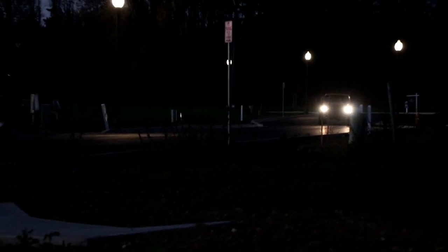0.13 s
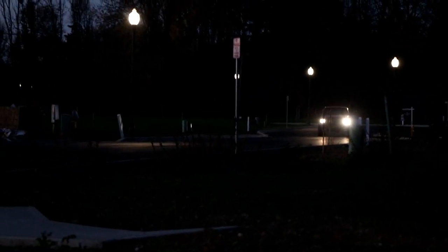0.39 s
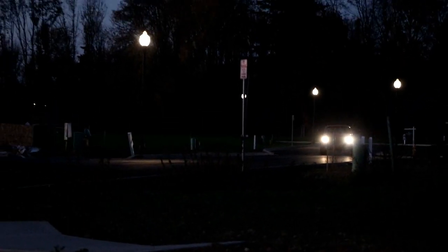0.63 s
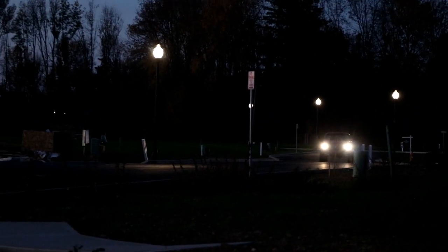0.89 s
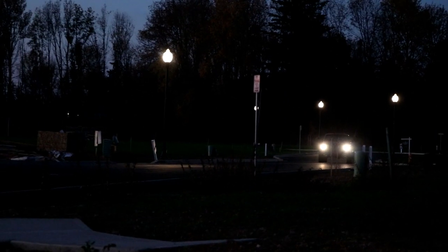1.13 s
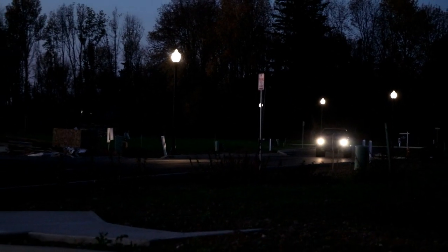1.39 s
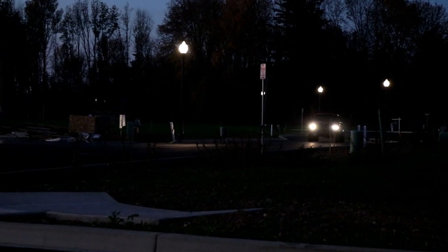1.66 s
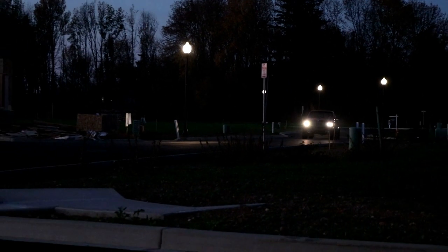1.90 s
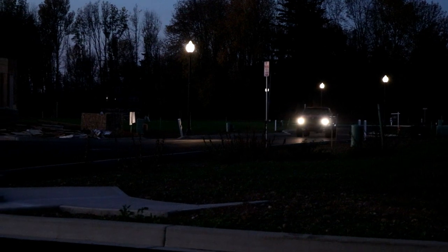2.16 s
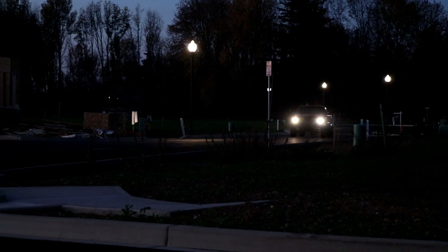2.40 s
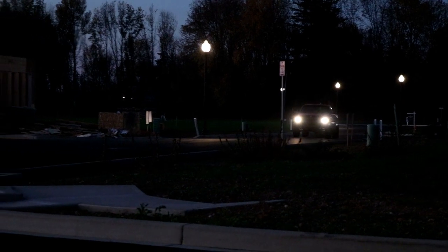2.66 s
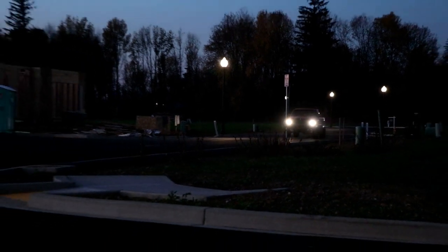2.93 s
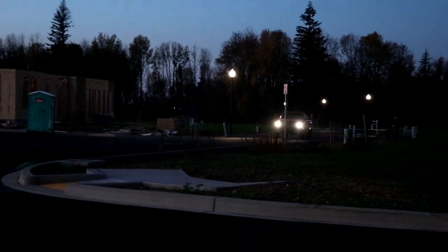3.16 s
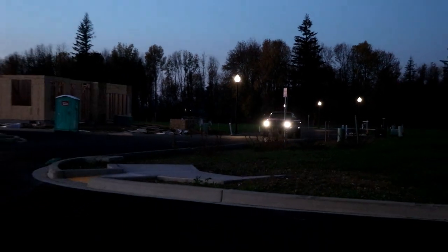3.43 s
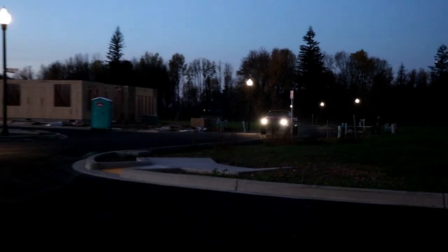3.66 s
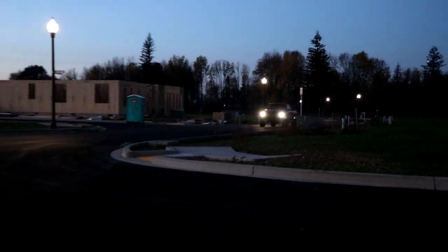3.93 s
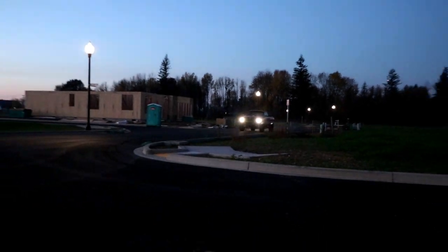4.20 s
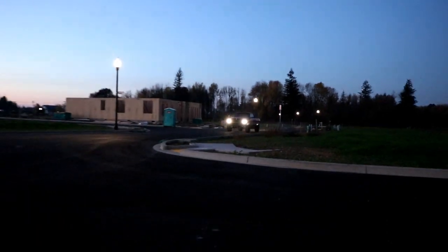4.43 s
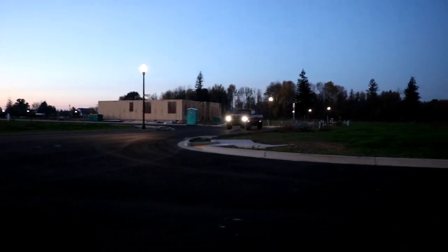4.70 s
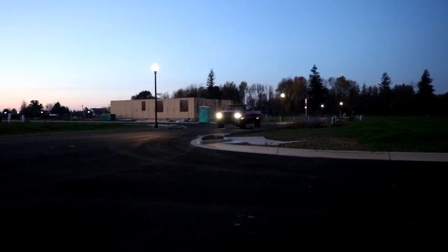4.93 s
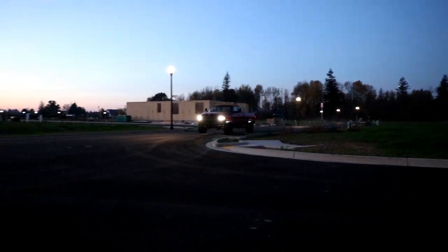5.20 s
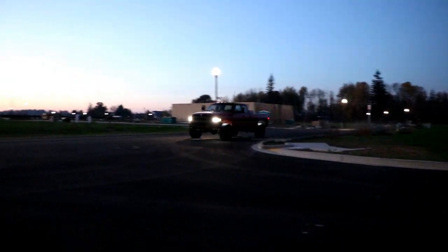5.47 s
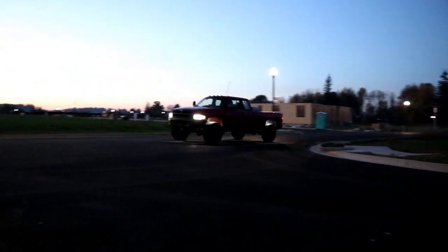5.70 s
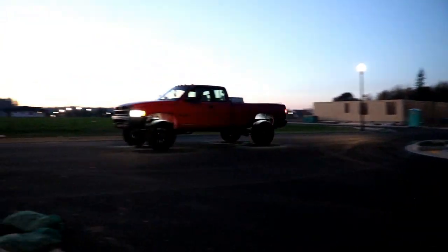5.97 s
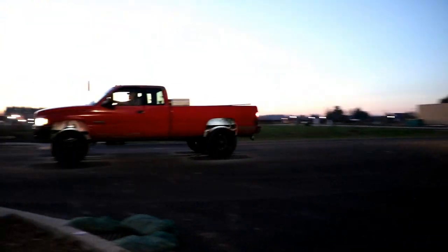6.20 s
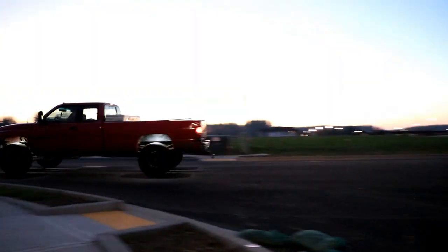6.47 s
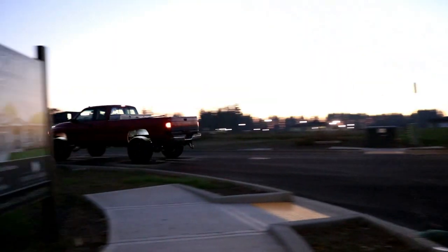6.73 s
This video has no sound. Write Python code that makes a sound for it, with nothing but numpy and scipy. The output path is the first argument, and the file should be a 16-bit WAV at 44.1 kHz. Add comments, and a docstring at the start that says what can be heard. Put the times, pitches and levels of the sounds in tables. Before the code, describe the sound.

A distant diesel pickup drones steadily, dips for a gear change, pulls back up louder as it nears, then lifts off and rolls past on humming tyres.

```python
"""At dusk, over faint distant town noise, a six-cylinder diesel pickup holds its governed speed far off.
It changes gear, its turbocharger whistles up very high, and it pulls back to the governor as it nears.
The engine block starts to ring; roar and ring surge just before the driver lifts off. Then the revs fall,
the whistle runs down and the truck rolls past on humming tyres. The exhaust is a sum of cosines tied to
the firings; rush, tyres and town are coloured noise; whistle, tread hum and block ring are fuzzy tones."""
import sys
import numpy as np
from scipy import signal
from scipy.io import wavfile
from scipy.ndimage import uniform_filter1d, map_coordinates

SR = 44100
rng = np.random.default_rng(int(sys.argv[2]) if len(sys.argv) > 2 else 0)


def voltage_ratio(decibels):
    """Convert decibels (scalar or array-like) to amplitude ratios, 20 dB per decade."""
    exponent = np.asarray(decibels, float) / 20
    return 10 ** exponent


def wav_out(sig):
    """Save sig, one row per channel (or a flat mono array), as 16-bit PCM at SR to the path in sys.argv[1]."""
    wavfile.write(sys.argv[1], SR, np.round(np.clip(np.atleast_2d(sig).T, -1, 1) * 32767).astype(np.int16))


N = 302085

# engine speed and its two main tones: start_s, firing_hz, firing_tone_level_db, second_harmonic_level_db
ENGINE = [(0, 132.9, -28.5, -38), (.9, 132.9, -27, -36.5), (1.3, 132.1, -28.5, -36.5),
          (1.44, 124.5, -32, -39.5), (1.53, 114, -39, -35.5), (1.59, 98.1, -57, -56),
          (1.75, 62.8, -49, -45), (2.0, 57.15, -62, -44), (2.1, 56, -66, -55), (2.19, 56.8, -53, -42.5),
          (2.27, 79.9, -36.5, -50), (2.34, 90.5, -41, -42.5), (2.42, 102.9, -34, -42),
          (2.52, 112.1, -31.5, -30.5), (2.64, 119.2, -33.5, -32), (2.9, 130.6, -29, -31),
          (2.99, 132.1, -30, -23), (3.36, 133.2, -25.5, -25.5), (3.44, 133.3, -23.5, -28.5),
          (3.76, 133.3, -23.5, -26.5), (5.25, 134.8, -18, -20.5), (5.69, 135.2, -16.5, -25.5),
          (5.73, 119.8, -32, -24.5), (5.8, 93.9, -36.5, -49), (5.87, 84.83, -40.5, -28.5),
          (6.0, 76.86, -34.5, -33.5), (6.3, 68.24, -29.5, -33), (6.64, 60.5, -58, -31),
          (6.85, 59.3, -48, -31.5)]
LIFT_S = 5.69  # foot off the pedal


def evened(x):
    """Scales a sound to rms 1."""
    return x / np.sqrt(np.mean(x ** 2) + 1e-20)


def played(rows):
    """Draws straight lines between the rows of a table: each column gets one value per sample."""
    s, *columns = np.transpose(rows)
    return [np.interp(np.arange(N) / SR, s, c) for c in columns]


def drift(rate_hz):
    """A slow random curve of rms near 1 that takes a new random value rate_hz times a second."""
    steps = rng.standard_normal(2000)
    return map_coordinates(steps, [np.arange(N) * rate_hz / SR], order=2)


def noise(spectrum, patchy_db):
    """Noise of rms 1, built from random short spectra of a given colour with drifting loud patches."""
    frames, hz = N // 256 + 5, np.fft.rfftfreq(1024, 1 / SR)
    a, b, patches = rng.standard_normal((frames, 513, 3)).T
    patches = uniform_filter1d(patches, size=10, axis=0)  # smooth across frequency
    patches = evened(uniform_filter1d(patches, size=12, axis=1))  # smooth across time
    f, db = np.transpose(spectrum)
    colour_db = np.interp(np.log(hz + 1), np.log(f + 1), db, left=-90, right=-90)
    spectra = (a + 1j * b) * voltage_ratio(colour_db[:, None] + patchy_db * patches)
    return evened(signal.istft(spectra, nperseg=1024, noverlap=768)[1][:N])


def resonate(hz, width_hz):
    """A fuzzy tone of rms 1: slow noise, spread about width_hz wide, shifted up to the pitch curve hz."""
    steps = rng.standard_normal((20000, 2)).T
    along = np.cumsum(width_hz * np.ones(N)) / SR
    a, b = (map_coordinates(s, [along], order=1) for s in steps)
    carrier = np.exp(2j * np.pi * np.cumsum(hz) / SR)
    return evened(((a + 1j * b) * carrier).real)


def staged():
    """Exhaust colour for each stage of the drive, held until the next stage and blended briefly."""
    # steady, gear change, pulling up, reaching the governor, held there, last surge, rolling by:
    # start_s, third_harmonic_db (relative to second), uneven_orders_db (relative to firing tone),
    # brightness_db_per_octave (of the uneven orders)
    stage_rows = [(0, -16, -4.5, -8), (1.54, -9, -1, -1.5), (2.3, -11.5, -8, 10), (2.92, -14.5, 4, -4.5),
                  (3.4, -8.5, 2, -5), (5.5, -18, -1.5, -1), (5.72, -6.5, 3, 4)]
    blend_s = 0.046
    s, *columns = np.transpose(stage_rows)
    now = np.searchsorted(s, np.arange(N) / SR, side="right") - 1
    return [uniform_filter1d(c[np.maximum(now, 0)], size=int(blend_s * SR)) for c in columns]


def exhaust(fired):
    """Suction-first pressure pulses as multiples (orders) of the two-turn cycle; firings vary in strength."""
    # cylinders differ, so every order sounds: order, level_db (relative to firing tone,
    # before the stage, pipe and random changes)
    uneven_orders = [(1, -48), (2, -44.5), (3, -34), (4, -33), (5, -40.5), (6, 0), (7, -35.5), (8, -32),
                     (9, -11), (10, -14.5), (11, -22), (12, -3), (13, -18), (14, -20.5), (15, -10.5),
                     (16, -29), (17, -13.5), (18, -13), (19, -22.5), (20, -19), (21, -27.5), (22, -21.5),
                     (23, -12), (24, -18), (25, -20.5), (26, -17.5), (27, -40.5), (28, -22.5), (29, -22),
                     (30, -21.5), (31, -24.5), (32, -29), (33, -46), (34, -33), (35, -29.5), (36, -26.5)]
    # the tailpipe favours the middle of the uneven orders and closes above: pitch_hz, gain_db
    pipe_gain = [(60, -2), (300, -0.2), (450, 0), (600, 1.5), (680, 0.5), (760, -0.5), (900, -8.5)]
    rough_db, rough_top_db = 0.8, 0.5  # firing strength acting on the firing tone and on all above it
    waver_db, hunt_db = 1.6, 0.5  # slow level drift of each uneven order and of the firing tone
    slip = 0.002  # timing scatter in turns
    lag, banks = 0.6, 0.15  # radians per harmonic; turns by which the half orders lead

    firing_hz, first_db, second_db = played(ENGINE)
    third_db, uneven_db, bright_db = staged()
    angle = 2 * np.pi * fired
    strength = map_coordinates(rng.standard_normal(1200), [fired + 0.5], order=1)

    # the pipe holds the overtones back a little
    top = -voltage_ratio(second_db) * np.cos(2 * angle - lag)
    top -= voltage_ratio(second_db + third_db) * np.cos(3 * angle - 2 * lag)
    for order, db in uneven_orders:
        if order in (6, 12, 18):  # the firing tone and its two harmonics are made separately
            continue
        if order % 3 == 0:
            start = 0.5 - lag * (order / 6 - 1) / (2 * np.pi) + banks * (order % 2)
        else:
            start = rng.random()
        level_db = first_db + uneven_db + db + bright_db * np.log2(order / 12) + waver_db * drift(9)
        level_db += np.interp(order * firing_hz / 6, *np.transpose(pipe_gain))
        # timing scatter blurs high orders most
        start = start + slip * (order / 6) ** 2 * drift(25)
        top += voltage_ratio(level_db) * np.cos(order * angle / 6 + 2 * np.pi * start)

    first = -voltage_ratio(first_db + rough_db * strength + hunt_db * drift(7)) * np.cos(angle)
    # a harder firing also lifts the overtones, a little less than the firing tone
    top_strength = voltage_ratio(rough_top_db * strength)
    return np.sqrt(2) * (first + top * top_strength)  # root 2 makes the levels rms


def rush(fired):
    """Exhaust roar, combustion clatter and air hiss: three noises that puff with the firings."""
    # levels before puffing: start_s, clatter_level_db, hiss_level_db
    rush_levels = [(0, -51, -83), (.3, -55.5, -80), (1.2, -52, -77.5), (2.0, -62.5, -75.5),
                   (2.27, -57, -76), (2.54, -47.5, -74), (2.95, -43, -66), (3.7, -42.5, -67.5),
                   (4.6, -38, -61.5), (5.66, -34.5, -56), (5.77, -43.5, -63), (5.95, -38, -60),
                   (6.2, -41.5, -65), (6.65, -37, -55), (6.85, -38.5, -59)]
    # noise colour of the exhaust roar: pitch_hz, density_db (relative, per Hz)
    roar_colour = [(24, -61), (40, -25), (81, -29.5), (134, 1.5), (176, -7.5), (271, 1.5), (450, -9.5),
                   (520, -9.5), (1710, -20.5), (3000, -38.5), (3900, -54.5), (6600, -120)]
    # noise colour of the combustion clatter: pitch_hz, density_db (relative, per Hz)
    clatter_colour = [(900, -16.5), (1500, -7), (2200, -2), (2600, 0), (3050, 1), (3600, -1.5), (4000, -7),
                      (5000, -13), (7000, -23.5), (9000, -40.5)]
    # noise colour of the air hiss: pitch_hz, density_db (relative, per Hz)
    hiss_colour = [(4000, -13), (6000, 4), (8000, 3.5), (10500, -5.5), (13000, -14.5), (15500, -18.5)]
    roar_over_clatter_db = 8.5

    clatter_db, hiss_db = played(rush_levels)
    # the roar surges just before the lift
    surge_s = [LIFT_S - 0.14, LIFT_S - 0.04, LIFT_S + 0.072]
    surge_db = np.interp(np.arange(N) / SR, surge_s, [0, 6.5, 0])
    # front and rear cylinders take turns
    cylinder_db = np.array([12.0, -0.5, 6.0, -7.0, 5.0, -4.5])[fired.astype(int) % 6]
    puff = np.exp(-(fired % 1) / 0.2) * voltage_ratio(cylinder_db)  # dies away within each firing
    puff = evened(uniform_filter1d(puff, size=90))
    roar_db = clatter_db + roar_over_clatter_db + surge_db
    roar = voltage_ratio(roar_db) * (1 + 0.16 * puff) * noise(roar_colour, patchy_db=0.0)
    clatter = voltage_ratio(clatter_db) * (1 + 0.068 * puff) * noise(clatter_colour, patchy_db=0.86)
    hiss = voltage_ratio(hiss_db) * (1 + 0.096 * puff) * noise(hiss_colour, patchy_db=0.3)
    return roar + clatter + hiss


def tyres():
    """A wide rolling rush, then the fuzzy hum of two axles' tread blocks, sinking as the truck slows and leaves."""
    # tread hum: start_s, upper_pitch_hz, upper_level_db, lower_pitch_hz, lower_level_db
    tread_rows = [(5.6, 690, -38, 537, -43), (6.05, 648, -32.5, 514.2, -38), (6.17, 615, -27, 495, -26),
                  (6.23, 598, -23, 405, -25), (6.36, 560, -33, 382, -32), (6.45, 530, -22.5, 374, -34),
                  (6.57, 548, -23, 365.1, -26), (6.65, 472, -31.5, 367, -33), (6.85, 430, -24, 356, -31.5)]
    # noise colour of the tyre rush: pitch_hz, density_db (relative, per Hz)
    tyre_colour = [(40, -36.5), (70, -20.5), (120, -15), (200, -5), (330, -11.5), (400, -2), (600, 0.5),
                   (850, -2.5), (1300, -8.5), (2000, -14), (3300, -22.5), (5000, -33), (8000, -42.5),
                   (15500, -58.5)]
    # loudness of the tyre rush: start_s, level_db
    rolling_levels = [(0, -66), (4.2, -37), (5.5, -25.5), (5.8, -25), (6.0, -22.5), (6.2, -19.5),
                      (6.5, -21), (6.85, -26.5)]
    upper_hz, upper_db, lower_hz, lower_db = played(tread_rows)
    hum = voltage_ratio(upper_db) * resonate(upper_hz, width_hz=50)
    hum += voltage_ratio(lower_db) * resonate(lower_hz, width_hz=40)
    hum *= np.arange(N) / SR > tread_rows[0][0]  # silent before its first row
    rolling = voltage_ratio(played(rolling_levels)[0]) * noise(tyre_colour, patchy_db=1.3)
    return hum + rolling


def town():
    """The distant town at dusk: steady, low-pitched noise."""
    # noise colour of the town: pitch_hz, density_db (relative, per Hz)
    town_colour = [(18, -52), (30, -21), (64, -15.5), (105, -5), (219, 4), (359, -6.5), (575, -12.5),
                   (830, -13), (1770, -15), (3490, -25), (7260, -55.5), (15500, -44)]
    return voltage_ratio(-42.5) * noise(town_colour, patchy_db=0.5)


def turbo():
    """Thin, flickering blade whistle in a skirt of intake hiss that grows with its level; it frays running down."""
    # spools up, sags a little under load, runs down after the lift: start_s, pitch_hz, level_db
    whistle_rows = [(2.4, 8300, -92), (2.55, 9800, -84), (2.95, 14720, -81), (3.35, 14870, -79),
                    (4.4, 14790, -73), (5.3, 14480, -67), (5.69, 14540, -67), (5.76, 13500, -69),
                    (5.9, 11500, -69), (6.3, 8500, -65), (6.85, 5100, -54)]
    narrowest_hz, widens_hz_per_db, frays_hz_per_s = 25, 6, 2200
    hz, db = played(whistle_rows)
    t = np.arange(N) / SR
    width_hz = narrowest_hz + widens_hz_per_db * np.maximum(db + 77, 0)
    width_hz += frays_hz_per_s * np.maximum(t - LIFT_S, 0)
    skirt = voltage_ratio(-6) * resonate(hz - 200, width_hz=500)
    skirt += voltage_ratio(-1.5) * resonate(hz - 600, width_hz=2000)
    skirt *= voltage_ratio(0.6 * np.minimum(db + 70, 0))  # weaker still while the whistle is below -70 dB
    return voltage_ratio(db) * (resonate(hz, width_hz) + skirt) * (t > whistle_rows[0][0])


def block():
    """The engine block rings under full load: a fuzzy tone that grows, surges and drops away by the lift."""
    ring_hz, start_s, surge_s = 2980, 4.3, 0.15
    top_s = LIFT_S - 0.05
    knots_s = [start_s, top_s - surge_s, top_s, LIFT_S]
    db = np.interp(np.arange(N) / SR, knots_s, [-52, -42, -35.5, -60], left=-90, right=-90)
    return voltage_ratio(db) * resonate(ring_hz * np.ones(N), width_hz=420)


def scene():
    """Adds all sources at the microphone; engine sounds share one running count of firings."""
    fired = np.cumsum(played(ENGINE)[0]) / SR
    mix = exhaust(fired) + rush(fired) + tyres() + town() + turbo() + block()
    return mix[None]  # one channel


def top_cut(x):
    """Nothing passes above the cut-off."""
    return signal.sosfilt(signal.butter(12, 15950, fs=SR, output="sos"), x)


def record(dry):
    """A small microphone drops the deepest bass, below about 55 Hz."""
    bass_cut = signal.butter(3, 55, "high", fs=SR, output="sos")
    finished = signal.sosfiltfilt(bass_cut, dry)
    return top_cut(finished)


dry = scene()
out = record(dry)
wav_out(out)
```